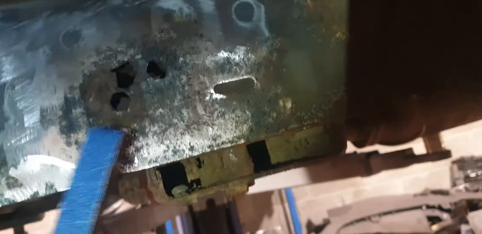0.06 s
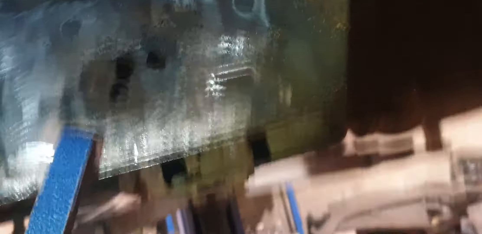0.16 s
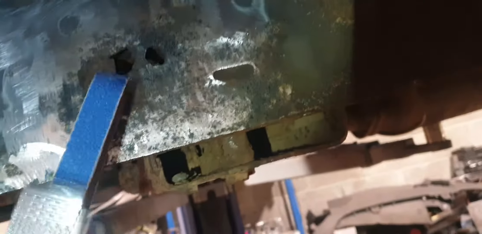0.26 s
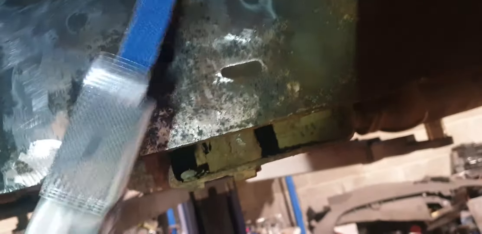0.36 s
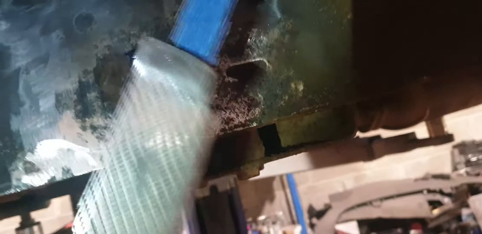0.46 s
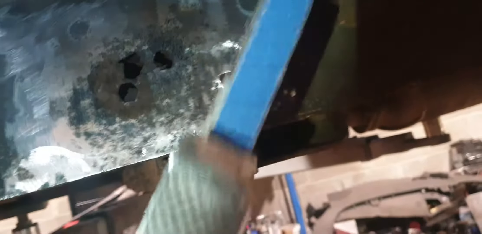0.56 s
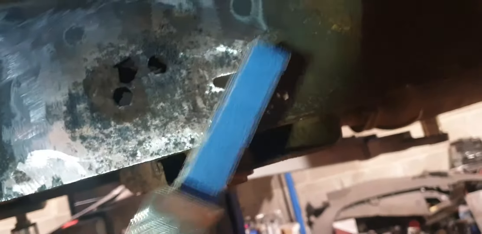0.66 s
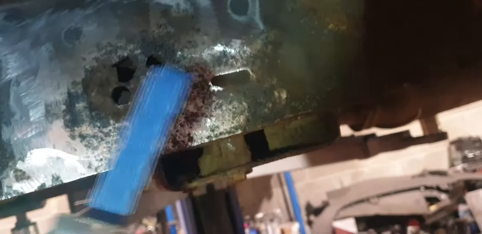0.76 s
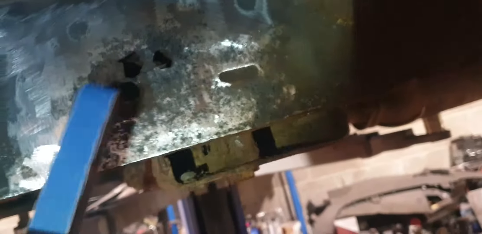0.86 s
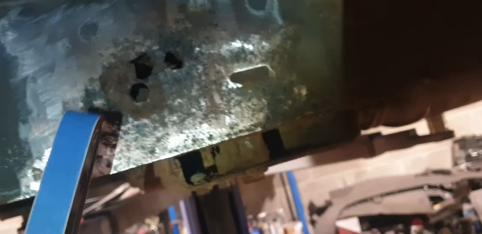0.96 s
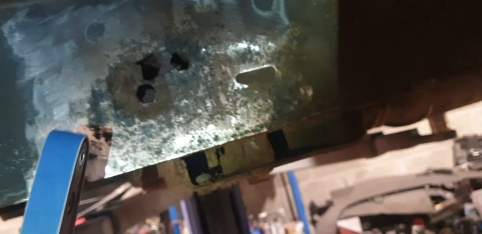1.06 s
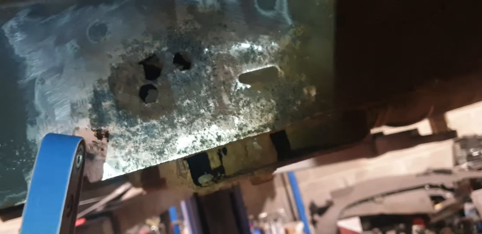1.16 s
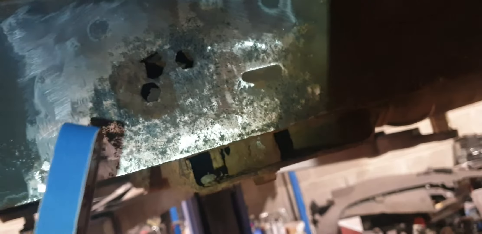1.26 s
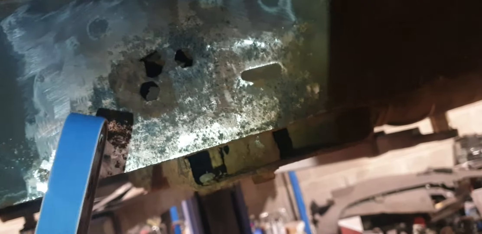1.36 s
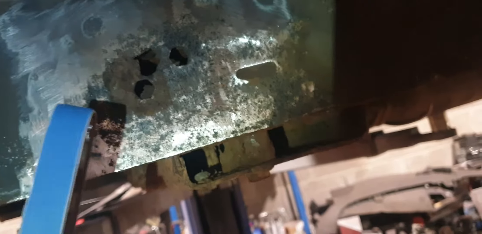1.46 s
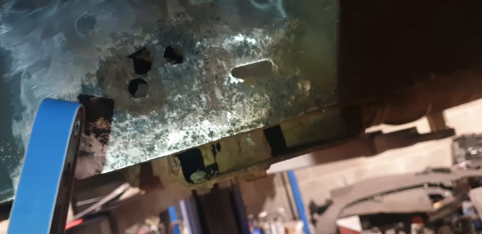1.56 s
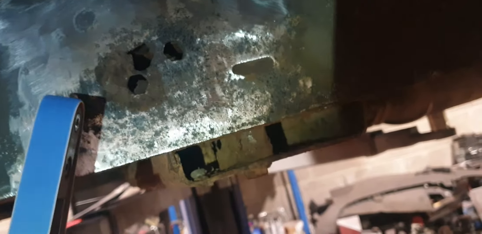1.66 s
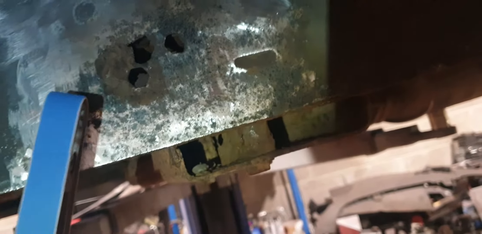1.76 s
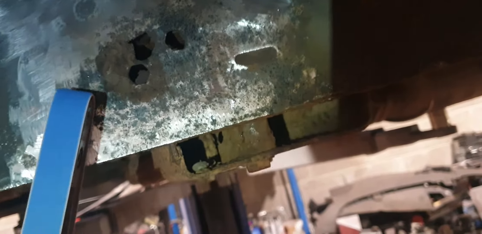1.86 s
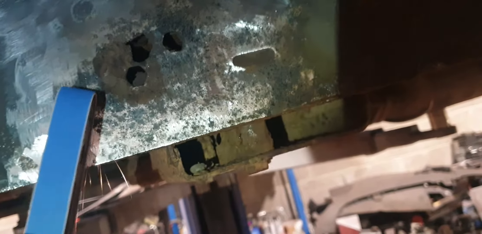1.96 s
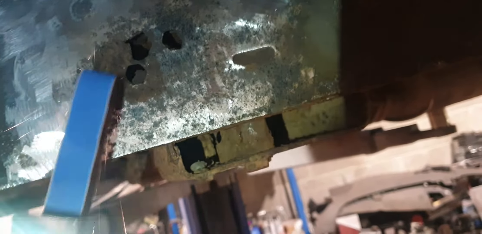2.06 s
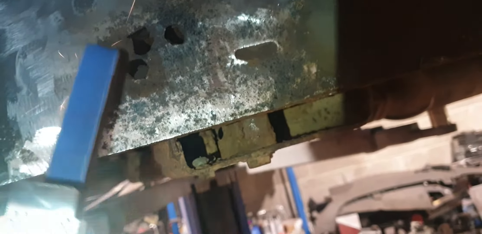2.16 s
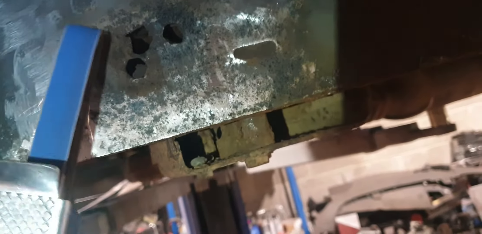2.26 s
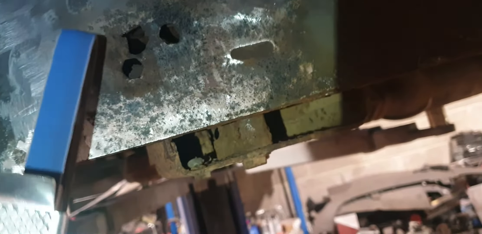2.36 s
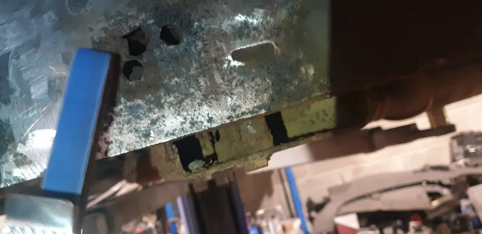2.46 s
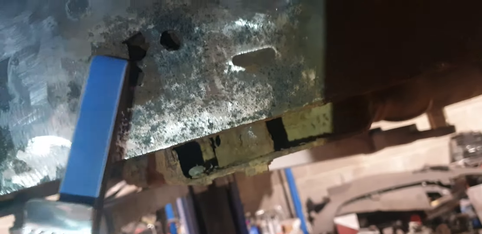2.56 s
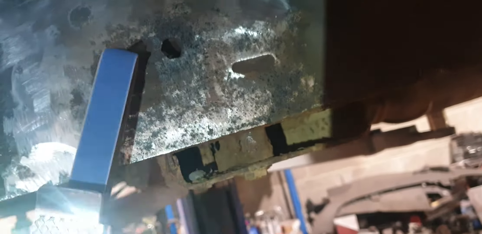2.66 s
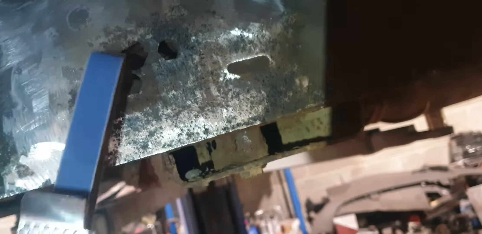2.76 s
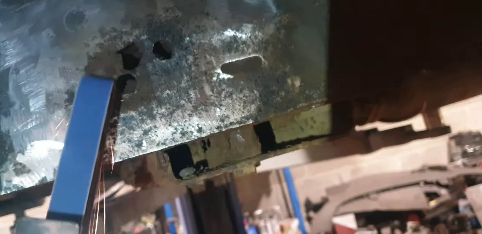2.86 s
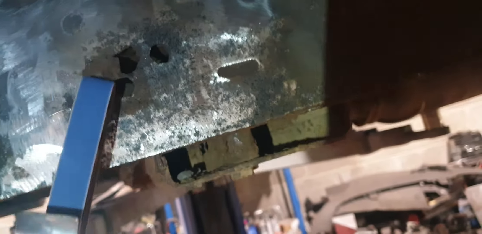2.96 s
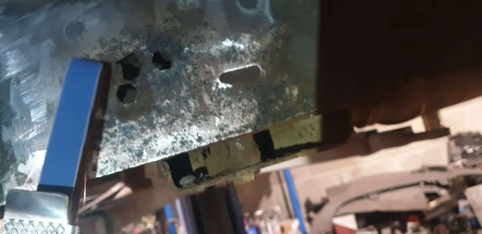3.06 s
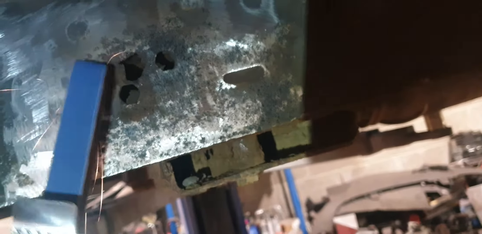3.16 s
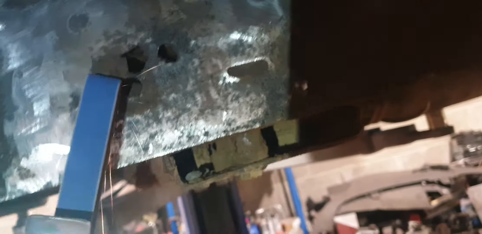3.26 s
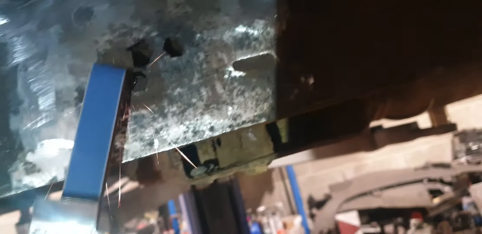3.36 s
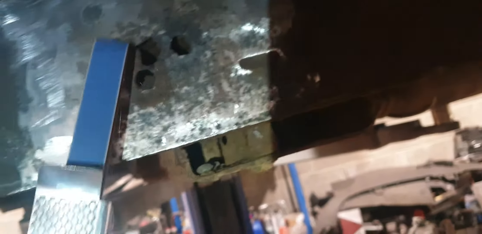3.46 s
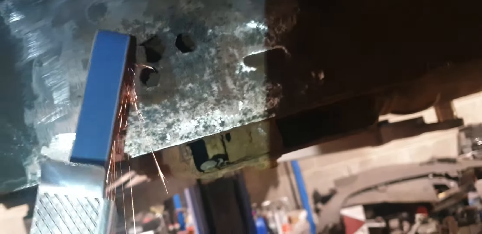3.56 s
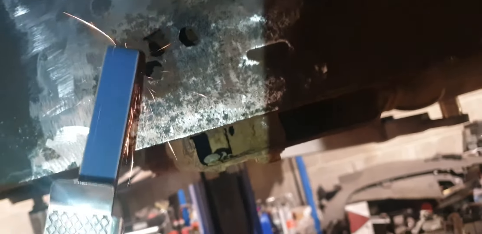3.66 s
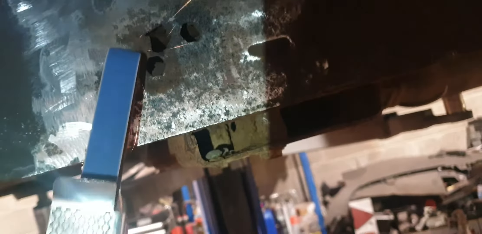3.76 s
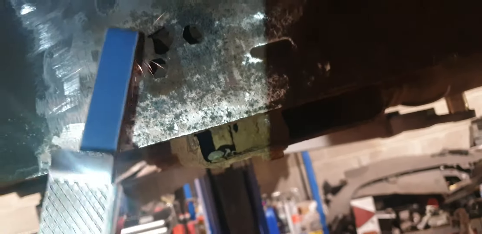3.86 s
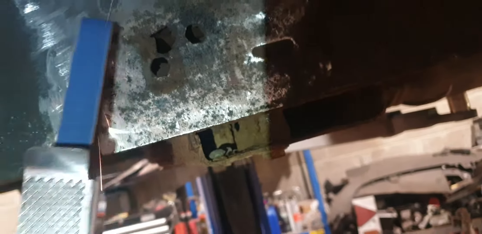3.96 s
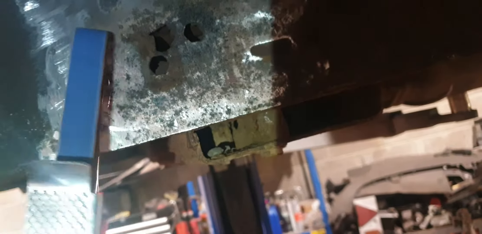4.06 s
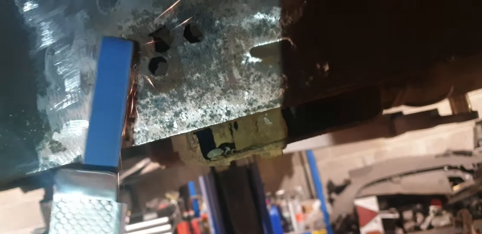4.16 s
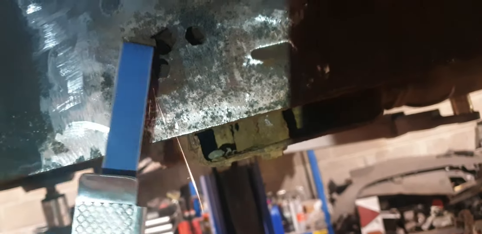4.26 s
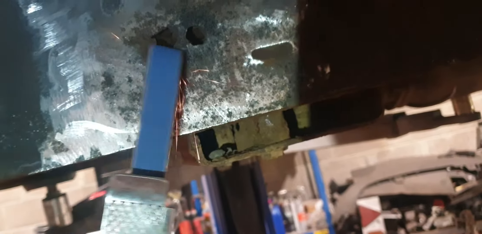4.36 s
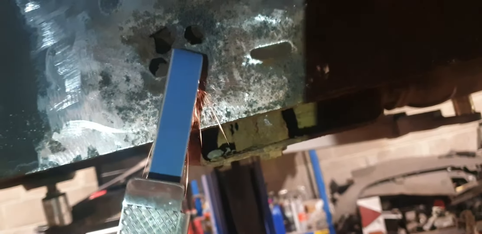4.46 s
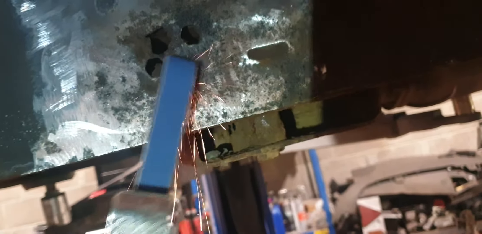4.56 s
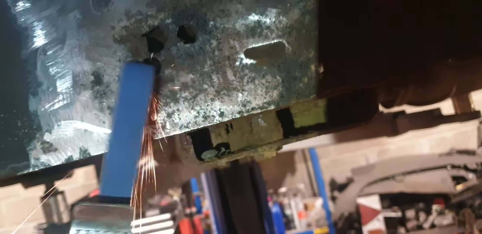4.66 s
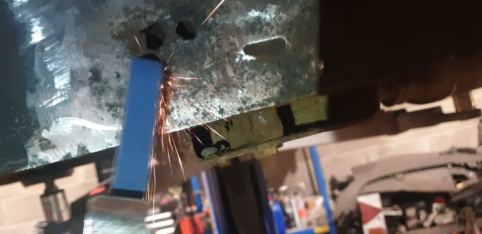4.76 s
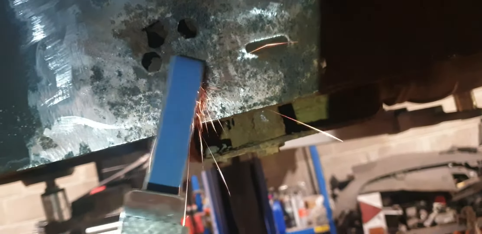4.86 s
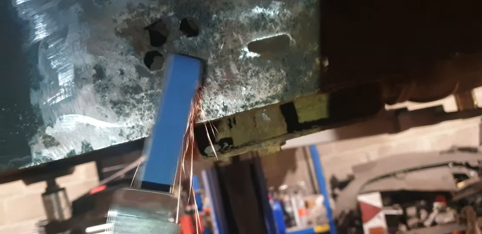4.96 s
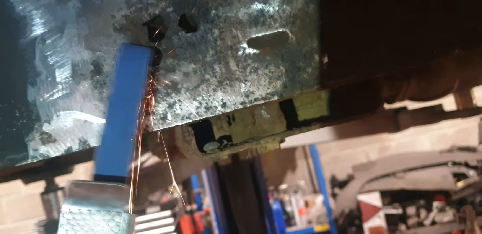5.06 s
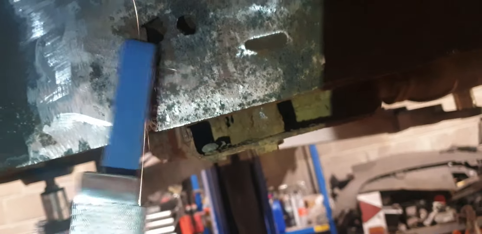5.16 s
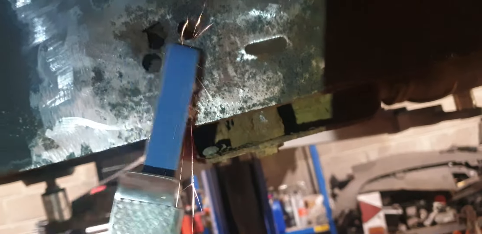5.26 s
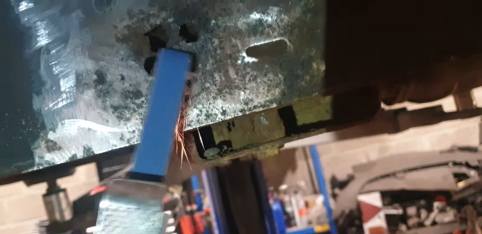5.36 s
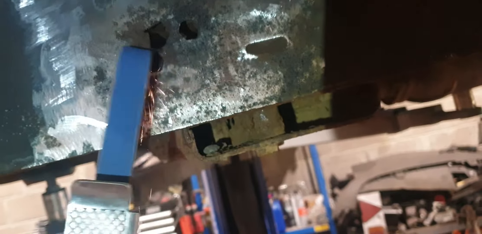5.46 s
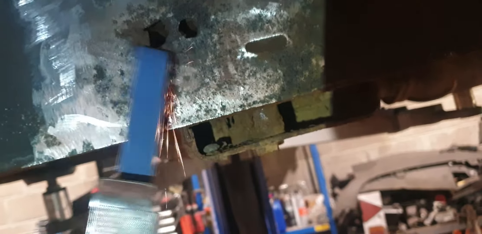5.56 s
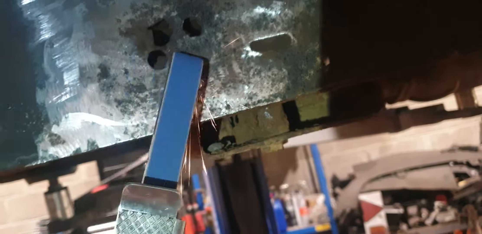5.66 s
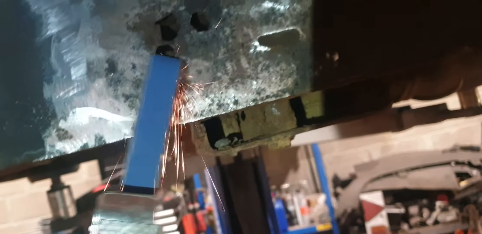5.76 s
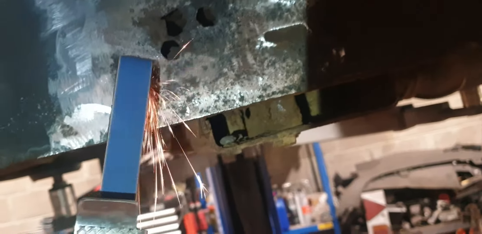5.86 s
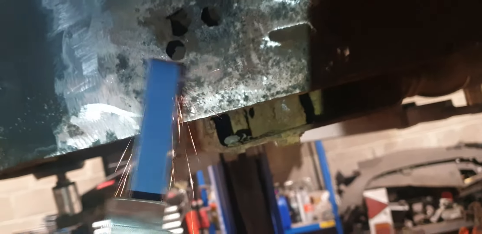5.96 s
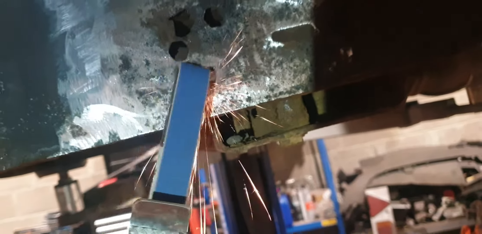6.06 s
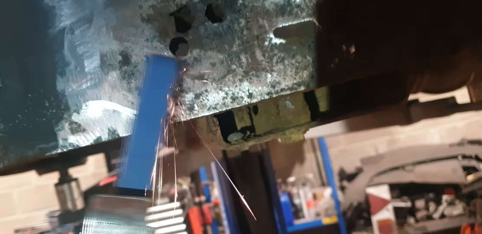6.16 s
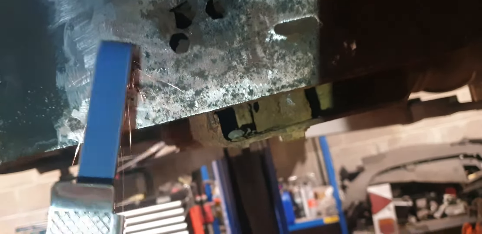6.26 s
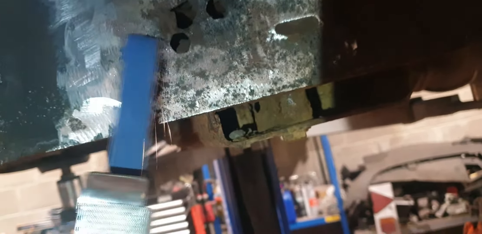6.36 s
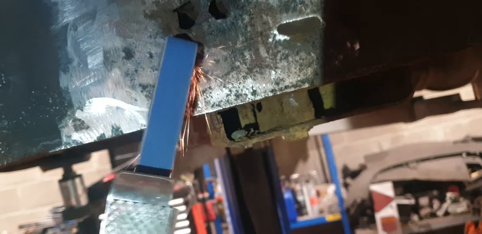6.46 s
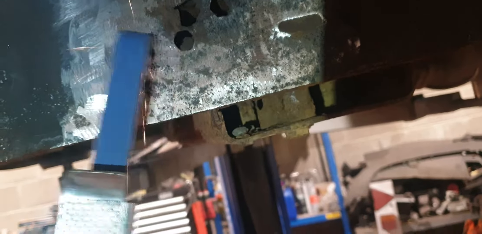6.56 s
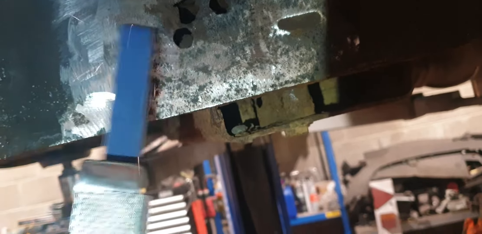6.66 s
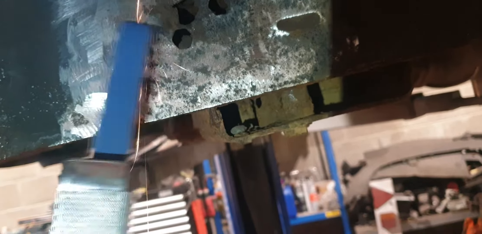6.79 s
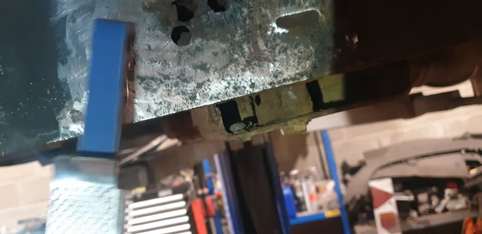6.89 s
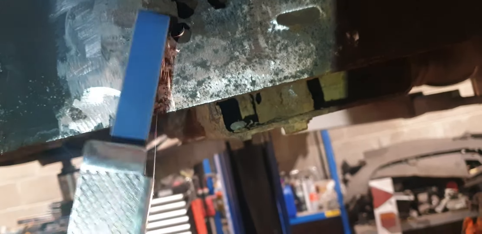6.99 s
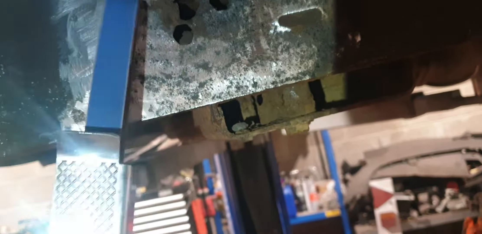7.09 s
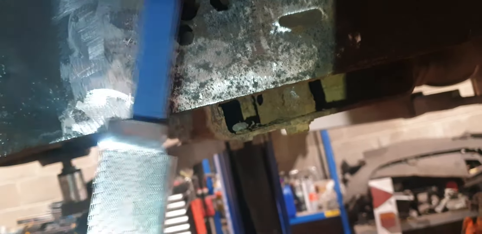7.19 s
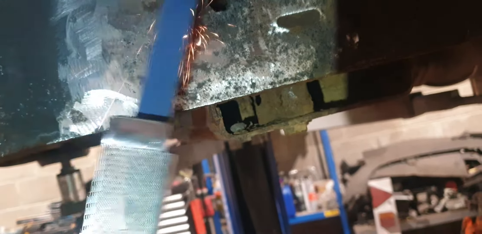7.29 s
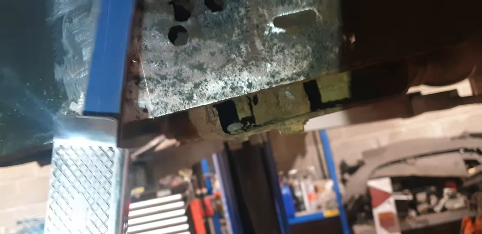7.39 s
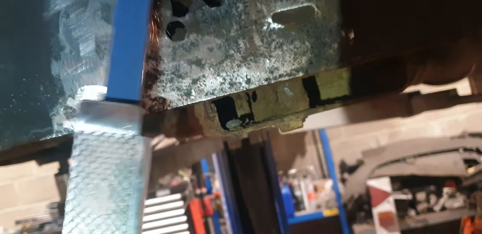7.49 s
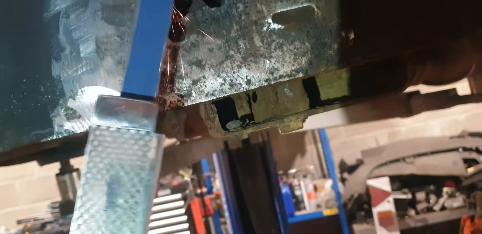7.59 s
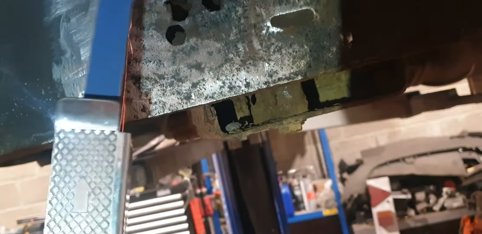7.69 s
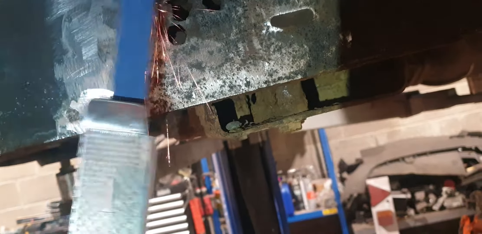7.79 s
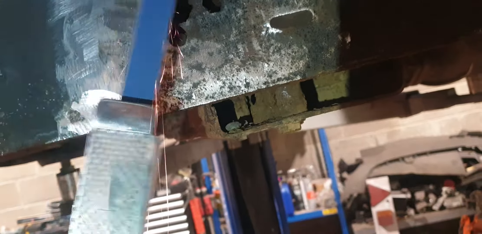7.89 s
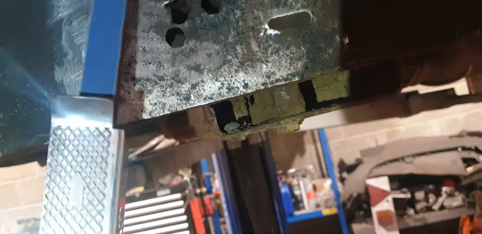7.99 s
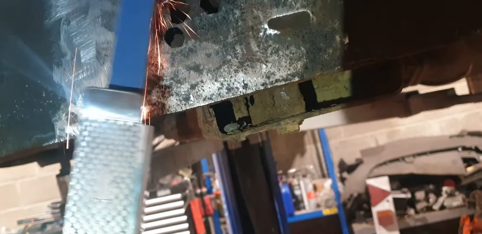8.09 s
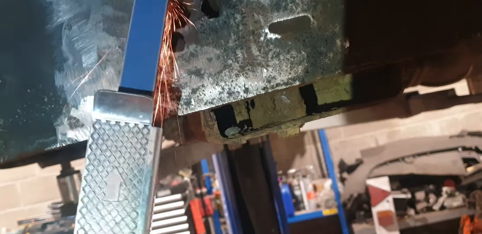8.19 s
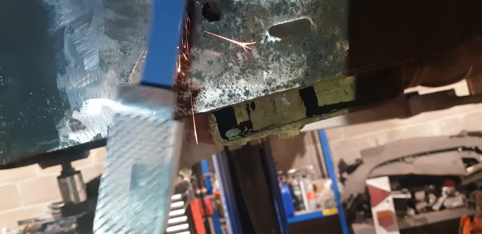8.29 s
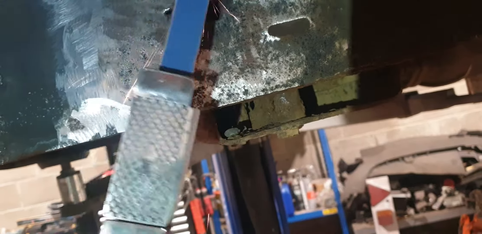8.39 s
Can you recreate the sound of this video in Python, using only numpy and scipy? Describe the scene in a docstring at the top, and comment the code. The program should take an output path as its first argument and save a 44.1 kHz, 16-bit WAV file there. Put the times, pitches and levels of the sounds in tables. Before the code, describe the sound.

A narrow air-powered belt sander putters into a rising whine, its belt rushing free, then rasps continuously on resonant sheet steel, close up.

```python
"""An air-driven narrow belt sander starts and grinds rust off a steel panel, with a two-port microphone close by.
Air whistles in the valve and hisses from the exhaust over a faint rumble; the motor coughs, knocks and putters.
As the rotor spins up its puffs buzz, the belt rushes free over its rollers and the vanes sing as sine partials.
From about two seconds the grit rings, rasps and fizzes on the steel as shaped noise that partly repeats each lap.
Lap harmonics sing through the panel, with brief resonant swells, snags and rings, and a growl at the close."""
import sys
import numpy as np
from scipy import signal
from scipy.fft import rfft, irfft
from scipy.io import wavfile
from scipy.ndimage import uniform_filter1d

SR = 44100
rng = np.random.default_rng(int(sys.argv[2]) if len(sys.argv) > 2 else 0)


def generate_wav(signal):
    """Clip the signal to [-1, 1] and save it as 16-bit WAV at the path in sys.argv[1]."""
    frames = np.transpose(np.atleast_2d(signal))
    scaled = np.clip(frames, -1, 1) * 32767
    pcm = np.round(scaled).astype(np.int16)
    wavfile.write(sys.argv[1], SR, pcm)


N = 371763
T = np.arange(N) / SR
BINS = np.fft.rfftfreq(N, 1 / SR)
VANES = 5
TURNS_PER_LAP = 3.4
FADE_S = 0.021  # fade-in of each layer that starts later than the scene

# phase by which the left port leads the right: (frequency [Hz], lead [rad])
PORT_PHASE = [(40, -1), (300, 0.56), (700, 1), (1050, 0.5), (1350, 3.5), (2000, 5), (2650, 4), (4000, 4.5),
              (4900, 4.5), (5300, 0.1), (7200, 1), (10500, 2), (14500, 1.6), (16000, -4)]
# left port against right, for sounds from the panel: (frequency [Hz], left minus right [dB])
PORT_BALANCE = [(400, 0.5), (1050, -8), (1300, 1), (1900, -10), (2650, -2), (3300, 4.5), (3950, -5),
                (4700, 3.5), (6600, 8), (8500, -5), (9700, -5), (11800, 9.5), (13500, -4.5), (15500, 14)]
# left port against right, for the air and the free belt: (frequency [Hz], left minus right [dB])
FREE_BALANCE = [(60, -1), (99, 5), (160, -11), (270, 6), (450, -2), (740, -0.5), (1220, -8), (2010, -8.5),
                (3330, -4), (5500, 3.5), (9080, -2.5), (15000, -2)]
# exhaust puffs of the slow motor: (time [s], level [dB])
PUTTER_LEVEL = [(.61, -27.5), (.7, -29), (.89, -30), (1.23, -25.5), (1.38, -33), (1.51, -59), (1.7, -73)]
# belt running free over its rollers: (time [s], level [dB])
FREE_RUN_LEVEL = [(.7, -48), (1.0, -28), (1.2, -21.5), (1.4, -17.5), (1.6, -16.5), (1.9, -17), (2.0, -18),
                  (2.15, -29), (2.4, -48)]
# how hard the belt is pressed on the steel: (time [s], relative level [dB])
PRESSURE = [(2.0, 1), (2.18, 0.5), (2.45, 3), (2.65, 3), (2.76, -1.5), (2.9, 1.5), (3.25, 2), (3.48, 2.5),
            (3.6, -2.5), (3.74, 4.5), (3.86, 2.5), (4.01, -2.5), (4.18, 0.5), (4.4, -1.5), (4.75, -3),
            (4.97, -6.5), (5.11, 1.5), (5.3, -1.5), (5.62, 2), (5.79, -6), (6.0, -9.5), (6.2, -11),
            (6.32, 2.5), (6.57, -3.5), (6.67, 7.5), (6.81, -2.5), (6.93, 7), (7.1, 1.5), (7.33, 3.5),
            (7.5, -0.5), (7.62, -2.5), (7.73, -5.5), (7.92, 0), (8.04, -8), (8.43, -9)]
# how loosely the belt rides on the panel, so that its joint beats once a lap: (time [s], looseness [0-1])
LIGHT_TOUCH = [(1.9, 0.15), (2.2, 0.3), (2.8, 0.67), (3.3, 0.74), (4.1, 0.46), (4.5, 0.2)]


def gain_of(db):
    """Decibels to gain."""
    return 10 ** (np.asarray(db) / 20)


def evened(x):
    """Scales to rms 1."""
    return x / np.sqrt(np.mean(x ** 2) + 1e-20)


def read(points, hz):
    """Reads a spectrum table on a log-frequency axis."""
    f, value = np.transpose(points)
    return np.interp(np.log(hz + 1), np.log(f + 1), value)


def curve(rows):
    """A control curve at every sample."""
    return np.interp(T, *np.transpose(rows))


def level(rows):
    """A dB curve as gain, fading in at its first row unless it sounds from the start."""
    start = rows[0][0]
    fade = np.clip((T - start) / FADE_S + 0.5, 0, 1) if start > FADE_S else 1
    return fade * gain_of(curve(rows))


def bumps(rows):
    """Each row (time [s], height [dB], length [s]) is a smooth rise and fall."""
    return sum(db * np.cos(np.pi * np.clip((T - s) / length, -0.5, 0.5)) ** 2 for s, db, length in rows)


def drift(rate):
    """Slow chance of rms 1, up to about this many changes a second."""
    knots = signal.resample(rng.standard_normal(round(2 * rate * N / SR) + 2), 8192)
    return evened(np.interp(T, np.linspace(0, T[-1], len(knots)), knots))


def resonance(hz, width):
    """Gain of one resonance at every frequency, halved at half the width [Hz] to either side."""
    return 1 / (1 + ((BINS - hz) / (0.5 * width)) ** 2)


def port_lag(hz):
    """Phase lag [rad] at the left and right port: none on the left, the table's lead on the right."""
    return read(PORT_PHASE, hz) * np.array([[0], [1]])


def ports(pair, colour, balance):
    """Colours two unrelated signals and blends them into what the two ports hear, rms 1."""
    # how alike the ports sound: (frequency [Hz], likeness [0-1])
    likeness = [(60, 0.69), (300, 0.72), (900, 0.73), (1300, 0.31), (2100, 0.41), (2650, 0.59),
                (3400, 0.25), (6500, 0.045), (15000, 0.094)]
    a, b = rfft(pair)
    same = np.clip(read(likeness, BINS), 0, 1)
    lean = gain_of(read(balance, BINS))
    right = (same * a + np.sqrt(1 - same ** 2) * b) * np.exp(-1j * read(PORT_PHASE, BINS))
    return evened(irfft(np.array([a * lean, right]) * colour / np.hypot(1, lean), N))


def at_ports(rows, hz):
    """Left and right gain of a tone that moves through a spectrum with a column for each port."""
    rows = np.array(rows)
    return gain_of([read(rows[:, [0, 1]], hz), read(rows[:, [0, 2]], hz)])


def shifting(pair, depth_db, size=26):
    """Reflections between tool and panel: peaks and dips wander over time and frequency."""
    z = signal.stft(pair, nperseg=1024, noverlap=768)[2]
    field = rng.standard_normal(z.shape)
    for _ in range(2):
        field = uniform_filter1d(field, size=size, axis=2)
        field = uniform_filter1d(field, size=9, axis=1)
    field = evened(field + 0.5 * field[::-1])  # the two ports share part of it
    return signal.istft(z * gain_of(depth_db * field), nperseg=1024, noverlap=768)[1][:, :N]


def swells(rows, drive):
    """Each row (time [s], centre [Hz], width [Hz], level [dB], length [s]) swells a resonance of the drive."""
    out = np.zeros((2, N))
    heard = rfft(ports(drive, 1, PORT_BALANCE))
    shapes = {(hz, width) for _, hz, width, _, _ in rows}
    tones = {(hz, width): irfft(heard * resonance(hz, width), N) for hz, width in shapes}
    for s, hz, width, db, length in rows:
        during = abs(T - s) < length / 2
        window = np.cos(np.pi * (T[during] - s) / length)
        swell = evened(tones[hz, width][:, during] * window)
        out[:, during] += gain_of(db) * swell * np.sqrt(np.mean(window ** 2))
    return out


def partial(turns, speed, order):
    """One multiple of a rotation as it reaches the two ports, rms 1."""
    return np.sqrt(2) * np.sin(2 * np.pi * order * turns - port_lag(order * speed))


def splice(laps, width=0.1):
    """A bump each lap, as the belt's joint passes the nose roller; width in laps."""
    return np.exp(-((laps % 1 - 0.5) / width) ** 2)


def grit(laps, repeat, grain_db, throb):
    """Grains strike the steel: one pattern comes round each lap and slowly wears, the rest is always new."""
    size, change_hz = 700, 0.3  # grains a lap, turnover of the worn pattern
    pattern = np.zeros((2, N))
    for channel in pattern:
        wear = 2 * np.pi * change_hz * T + drift(0.5) / 2
        for weight in (np.cos(wear), np.sin(wear)):
            loop = signal.resample(rng.standard_normal(size), 4 * size)
            channel += weight * np.interp(laps % 1, np.arange(len(loop)) / len(loop), loop)
    # now and then a new grain strikes much harder
    fresh = rng.standard_normal((2, N)) * gain_of(grain_db * np.minimum(rng.exponential(1, N), 4.2))
    share = np.clip(repeat, 0, 1)
    strikes = np.sqrt(share) * evened(pattern) + np.sqrt(1 - share) * evened(fresh)
    return strikes * (1 + throb * splice(laps))


def rotor_speed():
    """Turns a second: the rotor spins up, sags during the grinding and wavers with the hand."""
    # course of the rotor: (time [s], speed [turns/s])
    speed_course = [(.6, 48), (.7, 57.5), (.85, 67.5), (1.0, 80), (1.1, 92), (1.2, 112), (1.3, 137.0),
                    (1.6, 210.2), (1.72, 227.8), (1.96, 245.4), (2.05, 243.0), (2.26, 221.2), (2.62, 208.9),
                    (2.89, 220.4), (3.01, 214.4), (3.31, 217.3), (3.43, 209.8), (3.67, 215.0),
                    (3.88, 203.1), (4.09, 211.4), (4.24, 203.9), (4.93, 199.4), (5.65, 178.8),
                    (6.13, 182.2), (7.27, 173.4), (7.36, 178.1), (7.81, 177.5), (8.02, 169.8),
                    (8.26, 175.5), (8.41, 171.3)]
    wobble, hand_wobble = 0.000992, 0.002  # rms shares of the speed
    return curve(speed_course) * (1 + wobble * drift(20) + hand_wobble * drift(4))


def rumble(laps):
    """The panel shakes under the tool as low noise; a lightly pressed belt beats it once a lap."""
    # low spectrum of the shaking: (frequency [Hz], relative level [dB])
    rumble_tone = [(20, -24), (40, -17), (62, 1), (100, -8.5), (200, 2.5), (330, -6.5), (450, 2), (620, -5),
                   (900, 0), (1600, -18)]
    rumble_db, beat_db = -51, -54
    shake = ports(rng.standard_normal((2, N)), gain_of(read(rumble_tone, BINS)), PORT_BALANCE)
    beat = curve(LIGHT_TOUCH) * np.sqrt(2) * np.sin(2 * np.pi * laps)
    return gain_of(rumble_db + 0.47 * drift(25)) * shake + gain_of(beat_db + 2.0 * drift(10)) * beat


def air():
    """Compressed air whistles in the opening valve and hisses from the exhaust, sputtering for a moment."""
    # air through the throttle: (time [s], level [dB])
    air_level = [(0.0, -20), (.45, -21), (.6, -21), (.85, -21), (1.1, -21), (1.4, -22.5), (2.0, -27.5),
                 (2.3, -29.5)]
    # spectrum of the hiss: (frequency [Hz], relative level [dB])
    air_tone = [(40, -26), (150, -21.5), (400, -19.5), (750, -11), (1300, -6), (1750, 0.5), (2000, -1),
                (2280, 2.5), (2600, -4), (4200, -5), (5400, -8), (7900, -8.5), (10800, -8), (13000, -5.5),
                (15600, -12)]
    # the trigger is let go or squeezed hard for a moment: (time [s], change [dB], length [s])
    feathering = [(.275, -8.5, 0.052), (.325, 5.5, 0.1), (.473, -8, 0.037)]
    sputter = bumps([(0.554, 2, 0.11)]) * drift(50.9)  # as the rotor breaks free
    flow = level(air_level) * gain_of(bumps(feathering) + sputter)
    hiss = shifting(rng.standard_normal((2, N)), depth_db=2.4, size=60)
    hiss = ports(hiss, gain_of(read(air_tone, BINS)), FREE_BALANCE)
    whistle = swells([(0.011, 7900, 1100, -31, 0.58)], rng.standard_normal((2, N)))
    return flow * hiss + whistle


def knocks_and_growl():
    """Low knocks and rattles of the tool, and a growl at the close: brief swells of resonant noise."""
    # (time [s], centre [Hz], width [Hz], level [dB], length [s])
    low_swells = [(.315, 100, 220, -41, 0.075), (.35, 400, 700, -37, 0.18), (.58, 110, 240, -37.5, 0.33),
                  (2.04, 75.5, 90, -45, 0.085), (2.22, 80, 90, -45.5, 0.19), (7.35, 65.6, 50, -51, 0.12),
                  (7.32, 517, 200, -46, 0.14), (7.6, 65, 50, -51, 0.13), (8.41, 477, 330, -37.5, 0.19)]
    return swells(low_swells, rng.standard_normal((2, N)))


def putter(turns, speed):
    """Coughs, then a puff from each passing vane; the muffler smears the puffs and scatters their treble."""
    # the vanes seal unequally, so each puffs with its own strength: (level [dB]), one entry a vane
    vane_db = [-1, -26, -5.5, -38, -20]
    # single coughs as the rotor breaks free: (time [s], level relative to cough_db [dB])
    coughs = [(0.297, -8), (.484, 0), (.504, 0), (.543, 1.5), (.56, 0), (.594, 2)]
    # spectrum of a puff: (frequency [Hz], relative level [dB])
    puff_tone = [(30, -20), (55, -4), (100, 6), (160, 0.5), (240, 3.5), (330, -2), (420, -4.5), (560, -7.5),
                 (720, -7), (1000, -9), (1400, -4.5), (2000, -8), (2600, -11), (4000, -32)]
    # left port against right at the exhaust: (frequency [Hz], left minus right [dB])
    puff_balance = [(300, 0.5), (900, -6), (1900, -13)]
    unevenness, leak = 0.2, 0.38  # rms change of puff strength, steady noise beside the puffs
    cough_db, cough_s = -30, 0.00049
    smear = 0.589  # phase lag [rad] per root hertz
    scatter_hz, scatter_s = 900, 0.004  # frequency above which puffs scatter, decay of the echoes

    vane = np.floor(VANES * turns).astype(int)
    passing = np.diff(vane, prepend=vane[0])
    puffs = passing * gain_of(vane_db)[vane % VANES] * (1 + unevenness * drift(29.9))
    puffs = level(PUTTER_LEVEL) * (evened(puffs / np.sqrt(speed)) + leak * rng.standard_normal(N))
    for s, db in coughs:
        puffs += gain_of(cough_db + db) * np.exp(-((T - s) / cough_s) ** 2)

    echoes = rng.standard_normal((2, N)) * np.exp(-T / scatter_s)
    echoes = rfft(echoes) / np.linalg.norm(echoes[0])
    direct = 1 / (1 + (BINS / scatter_hz) ** 8)
    paths = np.sqrt(direct) * np.exp(-1j * smear * np.sqrt(BINS)) + np.sqrt(1 - direct) * echoes
    lean = gain_of(read(puff_balance, BINS))
    heard = np.array([lean, np.exp(-1j * read(PORT_PHASE, BINS))]) * np.sqrt(2) / np.hypot(1, lean)
    return irfft(rfft(puffs) * evened(gain_of(read(puff_tone, BINS))) * paths * heard, N)


def buzz(turns, speed):
    """The slow rotor's puffs merge into a fan of rising harmonics, each flickering on its own."""
    buzz_db, fall_db, flicker_db = -12, 0.45, 3.0  # relative to the putter, fall an order, rms flicker
    low_hz = 480  # harmonics below this are weak
    fan = 0
    for order in range(6, 21):
        gain = gain_of(flicker_db * drift(12) - fall_db * order)
        tone = partial(turns + rng.random(), speed, order)
        fan = fan + gain * tone / (1 + (low_hz / (order * speed)) ** 4)
    return gain_of(buzz_db) * level(PUTTER_LEVEL) * fan


def free_belt(laps):
    """The belt rushes over its rollers as repeating noise and its joint slaps them once a lap."""
    # spectrum of the rush: (frequency [Hz], relative level [dB])
    free_tone = [(100, -39), (600, -28), (1400, -19), (2400, -2.5), (3100, -4), (4100, -1), (5300, -5),
                 (6200, -4), (6900, -0.5), (7600, -9.5), (10000, -6.5), (12800, -2.5), (14500, -10),
                 (15600, -10)]
    # joint's slap while the belt is still slack: (time [s], share of the free-running level)
    slack = [(1.25, .11), (1.4, 0.33), (1.62, 0.19), (1.8, .007)]
    drive = grit(laps, repeat=0.68, grain_db=2.5, throb=0.43)
    rush = ports(shifting(drive, depth_db=3.0), gain_of(read(free_tone, BINS)), FREE_BALANCE)
    slaps = rng.standard_normal((2, N)) * splice(laps, width=0.04) * gain_of(2 * drift(25))
    slaps = ports(slaps, resonance(4100, 1380), FREE_BALANCE)
    return level(FREE_RUN_LEVEL) * (rush + curve(slack) * slaps)


def singing(laps):
    """Lap harmonics sing in the panel's resonances, louder under pressure and pulsed by the belt's joint."""
    # harmonics that the belt's uneven grit favours: (multiple of the lap rate, relative level [dB])
    belt_notes = [(20, 7), (21, -4), (22, -2), (23, -5), (24, 2.5), (25, 1.5), (26, -3), (27, 2), (28, -5),
                  (29, 0), (30, -3), (31, -1), (32, 7.5), (33, 3.5), (34, 4), (35, 3), (36, -8), (37, 6),
                  (38, -0.5), (39, -2.5), (40, -7), (41, -9), (42, -1), (43, -2), (44, 5), (45, -1.5),
                  (46, -10), (47, -4), (48, -2), (49, -10), (50, 4), (51, 1), (52, -13), (53, -9),
                  (54, 6.5), (55, -0.5), (56, -13), (57, -13), (58, -8)]
    # a note catches as the nose wanders: (time [s], multiple of the lap rate, rise [dB], length [s])
    flares = [(1.78, 37, 8, 0.66), (1.82, 38, 23, 0.66), (1.98, 48, 11, .45), (2.42, 31, 14.5, 0.78),
              (2.394, 33, 10, 0.45), (2.912, 31, 15.5, 0.54), (2.95, 55, 6.5, 0.92),
              (3.162, 33, 10.5, 0.63), (3.5, 43, 5, 0.6), (3.617, 54, 6.5, 0.8), (3.78, 38, 6, 0.5),
              (3.78, 39, 6, .35), (4.153, 33, 11, .4), (4.2, 32, 4.5, .5), (5.22, 32, 7, 1),
              (5.352, 35, 11, 0.37), (6.0, 44, 9, 0.97), (6.695, 37, 8.5, 0.16), (6.914, 37, 4, .3),
              (6.95, 38, 7, .25), (7.122, 44, 11, 0.47), (7.8, 44, 6, 0.7)]
    # how strongly the panel answers: (frequency [Hz], left gain [dB], right gain [dB])
    sing_tone = [(1100, -62, -58.5), (1300, -65, -57.5), (1540, -56, -52), (1610, -51, -44.5),
                 (1660, -60, -46.5), (1730, -49, -45), (1860, -54, -46.5), (1970, -57, -42),
                 (1980, -57, -44), (2080, -64, -46.5), (2180, -54, -46.5), (2260, -45, -41),
                 (2280, -46, -42), (2420, -40.5, -43.5), (2380, -55, -45), (2610, -49, -63),
                 (2810, -43, -41), (2740, -42.5, -50), (2950, -62, -60), (3220, -64, -46), (3220, -57, -39),
                 (3270, -45.5, -50), (3540, -50, -42), (3800, -56, -59), (4200, -66, -66)]
    sing_db, free_db, follow = 1.5, 9.0, 0.93  # overall, free-running share, power of the pressure
    swell_db, flutter_db, wander = 1.5, 3.0, 0.035  # rms: all notes, each note, turns of a middle note
    firm_pulse, loose_pulse = 0.18, 0.99

    notes = np.zeros(N)
    slip = wander * drift(25) / belt_notes[len(belt_notes) // 2][0]
    for order, db in belt_notes:
        flare_db = bumps([(s, rise, length) for s, note, rise, length in flares if note == order])
        gain = gain_of(db + flare_db + flutter_db * drift(9))
        notes += gain * np.sin(2 * np.pi * (order * (laps + slip) + rng.random()))
    drive = level(PRESSURE) ** follow + gain_of(free_db) * level(FREE_RUN_LEVEL)
    drive = drive * gain_of(sing_db + swell_db * drift(12))
    pulse = firm_pulse + loose_pulse * curve(LIGHT_TOUCH)
    notes *= np.sqrt(2) * drive * (1 + pulse * (splice(laps, width=0.18) - 0.35))
    panel = at_ports(sing_tone, BINS) * np.exp(-1j * port_lag(BINS))
    return irfft(rfft(notes) * panel, N)


def motor(turns, speed):
    """Vanes whine, swaying between the ports, with a brief octave; rotor orders hum where resonances lie."""
    # strength of the vane whine: (time [s], level [dB])
    whine_level = [(1.26, -31), (1.31, -22), (1.41, -23.5), (1.7, -27), (2.0, -30.5), (2.2, -34.5),
                   (4.7, -38.5), (5.4, -35.5), (8.43, -35.5)]
    # standing waves favour some pitches: (frequency [Hz], left gain [dB], right gain [dB])
    whine_tone = [(620, -9, -9), (690, -10, -2), (830, 6.5, 4), (860, -9.5, -5), (881, 0, -1),
                  (982, -6.5, 2), (1024, -1, -4), (1110, -4.5, -0.5), (1103, -7, -12), (1183, -4, 2),
                  (1200, -30, 2.5), (1236, -5, -1)]
    # tones of the running motor: (multiple of the rotor speed, level relative to the whine [dB])
    overtones = [(4, -24), (6, -19.5), (7, -22), (10, -6)]
    # resonances met by rotor orders: (multiple of the rotor speed, centre [Hz], width [Hz], level [dB])
    hums = [(1, 175.7, 9.7, -54), (2, 473, 14.4, -47.5), (2, 424, 160, -60.5), (2, 311, 17, -36.5),
            (3, 231, 28, -32.5), (4, 700, 32, -60), (5, 320, 46, -31)]
    waver_db, sway_db, overtone_waver_db, octave_db = 1.0, 1.5, 3.0, -35

    sway = gain_of(sway_db * np.array([drift(5.4), drift(6.5)]))
    whine = partial(turns, speed, VANES) * at_ports(whine_tone, VANES * speed)
    whine = whine * sway * gain_of(waver_db * drift(25))
    for order, db in overtones:
        whine += partial(turns, speed, order) * gain_of(db + overtone_waver_db * drift(25))
    hum = 0
    for order, hz, width, db in hums:
        answer = 1 / (1 + ((order * speed - hz) / width) ** 4) ** 2
        hum = hum + gain_of(db + 1.1 * drift(20)) * partial(turns, speed, order) * answer
    octave = gain_of(octave_db + overtone_waver_db * drift(29.9)) * partial(turns, speed, 2 * VANES)
    octave = octave * np.sqrt(bumps([(1.57, 1, 0.95)]))  # while the vanes run free
    return level(whine_level) * whine + octave + hum


def swells_and_rings(laps):
    """Squeals, snag sizzles and a swell of the free belt; the panel's main mode rings as the nose catches."""
    # squeals, snag sizzles and a swell of the free belt:
    # (time [s], centre [Hz], width [Hz], level [dB], length [s])
    tool_swells = [(1.54, 4030, 500, -23.5, 0.45), (2.65, 2180, 1100, -31, 0.081),
                   (4.195, 6730, 130, -27, 0.077), (5.1, 3940, 250, -33, .06), (5.24, 3900, 250, -32, 0.09),
                   (5.27, 4090, 100, -29, 0.91), (5.33, 1870, 330, -27, 0.38),
                   (5.48, 3960, 300, -27, 0.069), (6.96, 1990, 91, -24.5, 0.28),
                   (7.31, 5600, 1100, -24, 0.19), (7.33, 1760, 220, -26, 0.093)]
    # catches of the nose: (time [s], level [dB], length [s])
    panel_rings = [(2.63, -26, .14), (3.473, -32, .22), (3.88, -34, .16), (4.4, -44, .12), (5.209, -32, .2),
                   (5.54, -31, 0.17), (6.474, -32, .13), (6.995, -31, 0.15), (7.29, -30, .2),
                   (7.923, -31, .12)]
    panel_hz, panel_width_hz = 2664, 116
    rings = [(s, panel_hz, panel_width_hz, db, length) for s, db, length in panel_rings]
    return swells([*tool_swells, *rings], grit(laps, repeat=0.63, grain_db=0.0, throb=0.19))


def grinding(laps):
    """Grit fizzes, rings the panel and rasps the rust; pressure lifts the ring more than the rasp."""
    # spectra of the three layers: (frequency [Hz], relative level [dB])
    ring_tone = [(500, -39), (750, -29), (1200, -21), (1500, -9), (1950, 0.5), (2280, 2), (2480, 3),
                 (2680, 1), (2950, -7), (3400, -39)]
    rasp_tone = [(2000, -30.5), (2950, -15), (3350, -5.5), (3700, -8.5), (4000, -4.5), (4400, -6),
                 (5300, -4.5), (5900, -7), (6600, -3), (7500, -9), (9000, -17)]
    fizz_tone = [(5500, -42), (7500, -9.5), (8500, -4.5), (9800, -1.5), (10600, -1), (11700, 0),
                 (13200, -0.5), (15600, -2.5)]
    # the grit's fizz: (time [s], level before fizz_db is added [dB])
    fizz_level = [(1.95, -28), (2.06, -18.5), (2.22, -21.5), (2.97, -23), (3.19, -25.5), (3.37, -20.5),
                  (3.46, -24), (3.87, -22), (3.96, -26.5), (4.28, -20), (4.32, -23), (4.38, -18),
                  (4.44, -23), (4.81, -19.5), (4.84, -21), (5.22, -21), (5.83, -23), (5.87, -21),
                  (6.41, -23.5), (6.44, -18.5), (6.53, -24.5), (6.58, -19.5), (6.67, -24), (6.76, -20),
                  (6.94, -25.5), (7.0, -22.5), (7.41, -23.5), (7.5, -26.5), (7.54, -22), (7.68, -21),
                  (7.77, -25.5), (7.84, -24), (7.98, -20.5), (8.04, -25), (8.13, -23), (8.4, -23)]
    # the belt snags on an edge and scrapes: (time [s], rise of the rasp [dB], length [s])
    snags = [(2.05, 1, 0.1), (2.27, 2.5, 0.14), (2.64, 1, 0.073), (4.385, 6.5, 0.125), (4.61, 1.5, 0.11),
             (4.73, 3, .08), (5.1, 2, 0.07), (5.24, 5.5, 0.089), (5.49, 4.5, 0.081), (5.62, 2.5, 0.062),
             (7.32, 3.5, 0.35), (7.63, 6.5, 0.15), (7.92, 7, 0.13)]
    ring_db, rasp_db, fizz_db = -32.0, -22.5, 4.5
    rasp_follow = 0.36  # power of the pressure
    snag_ring, snag_fizz = 0.25, 0.061  # shares of the rasp's rise
    firm_throb, loose_throb = 0.1, 0.62
    fizz_waver_db, unsteady_db, flicker_db = 0.5, 0.72, 0.5  # rms

    throb = firm_throb + loose_throb * curve(LIGHT_TOUCH)
    snag_db = bumps(snags)
    ring = shifting(grit(laps, repeat=0.38, grain_db=7.0, throb=throb), depth_db=1.5)
    rasp = shifting(grit(laps, repeat=0.47, grain_db=2.5, throb=throb), depth_db=2.1)
    fizz = shifting(grit(laps, repeat=0.25, grain_db=3.5, throb=throb), depth_db=2.0, size=18)
    ring_gain = level(PRESSURE) * gain_of(ring_db + snag_ring * snag_db)
    rasp_gain = level(PRESSURE) ** rasp_follow * gain_of(rasp_db + snag_db)
    fizz_gain = level(fizz_level) * gain_of(fizz_db + snag_fizz * snag_db + fizz_waver_db * drift(7))
    sound = ring_gain * ports(ring, gain_of(read(ring_tone, BINS)), PORT_BALANCE)
    sound += rasp_gain * ports(rasp, gain_of(read(rasp_tone, BINS)), PORT_BALANCE)
    sound += fizz_gain * ports(fizz, gain_of(read(fizz_tone, BINS)), PORT_BALANCE)
    # uneven contact shakes all three together
    return sound * gain_of(unsteady_db * drift(10) + flicker_db * drift(60))


def scene():
    """One rotor speed drives the motor and the belt."""
    speed = rotor_speed()
    turns = np.cumsum(speed) / SR
    laps = turns / TURNS_PER_LAP
    start = rumble(laps) + air() + knocks_and_growl() + putter(turns, speed) + buzz(turns, speed)
    running = free_belt(laps) + singing(laps) + motor(turns, speed)
    return start + running + swells_and_rings(laps) + grinding(laps)


def record(dry):
    """The loudest peaks are rounded off; then the recorder's steep band limit."""
    rounded = dry / (1 + (dry / 0.85) ** 6) ** (1 / 6)
    edge = signal.firwin(801, 15800, window=("kaiser", 9), fs=SR)  # low-pass at 15.8 kHz
    return signal.oaconvolve(rounded, edge[None], "same")


dry = scene()
out = record(dry)
generate_wav(out)
```